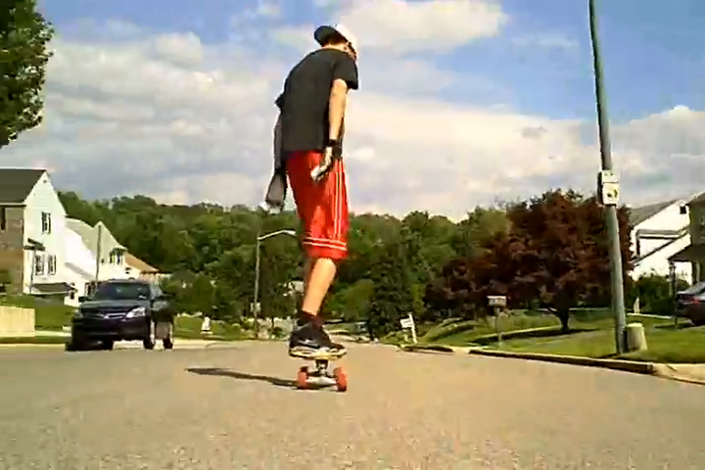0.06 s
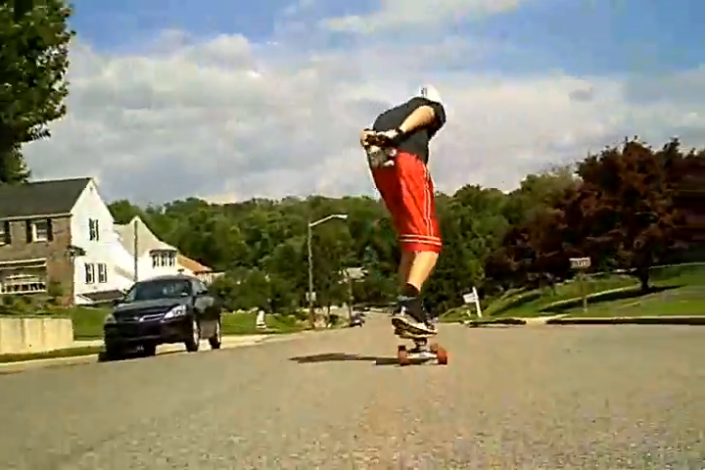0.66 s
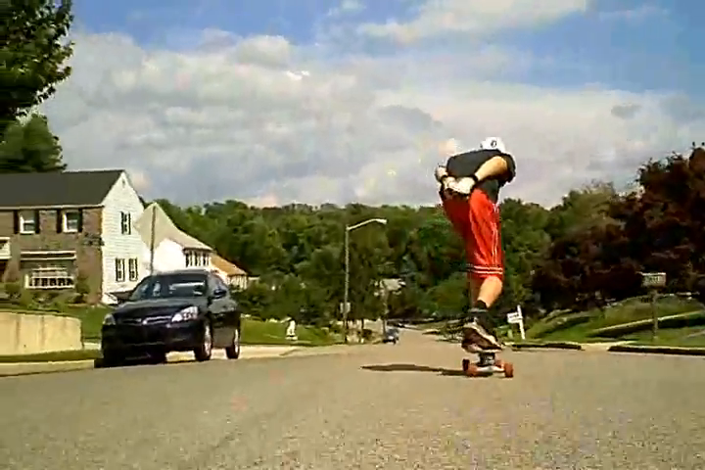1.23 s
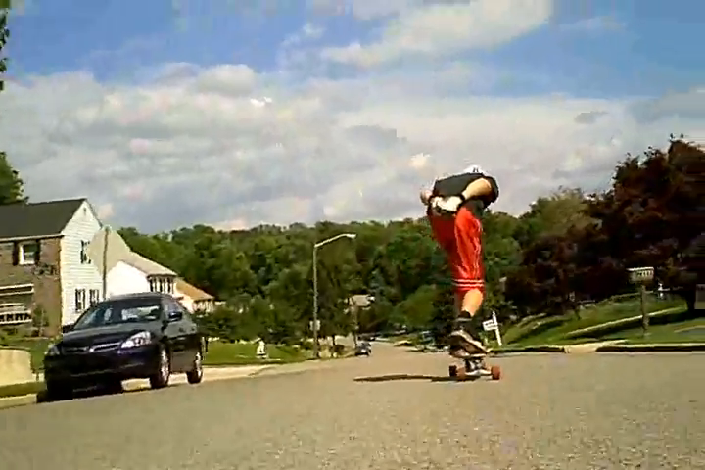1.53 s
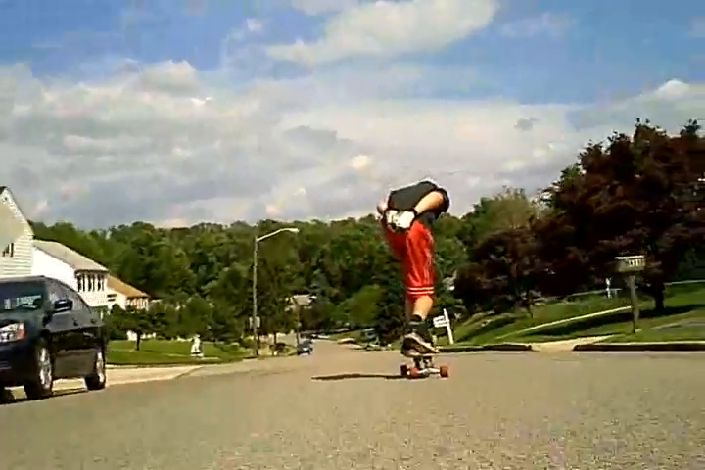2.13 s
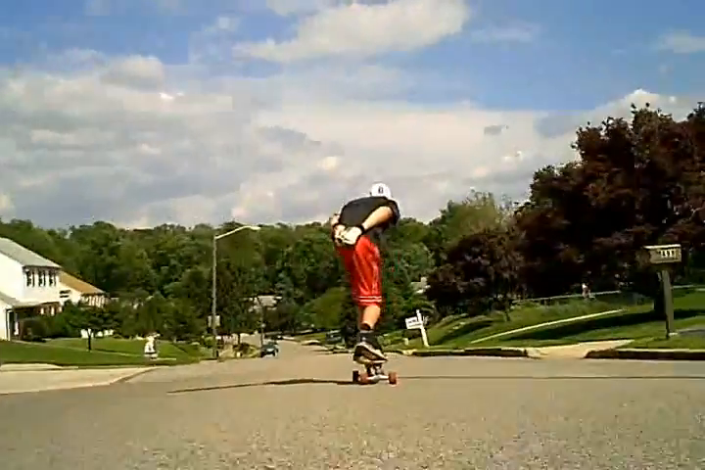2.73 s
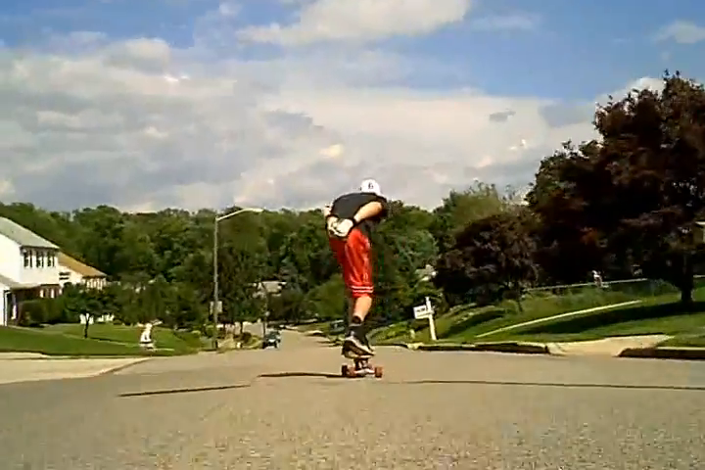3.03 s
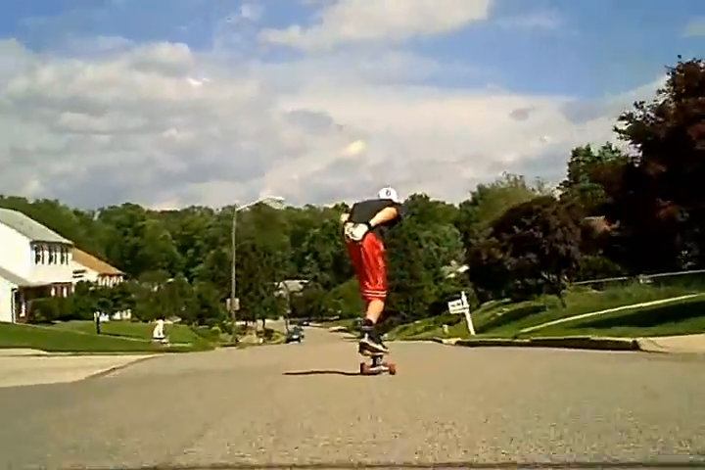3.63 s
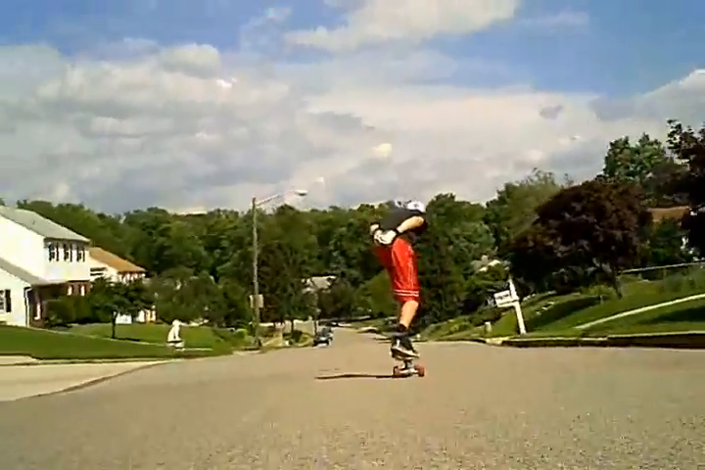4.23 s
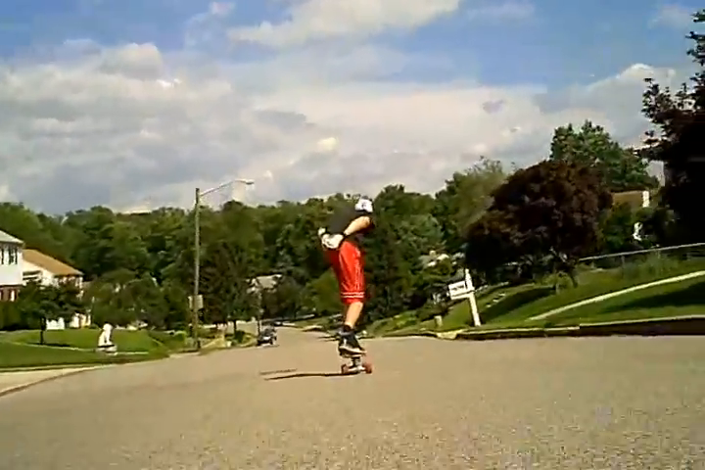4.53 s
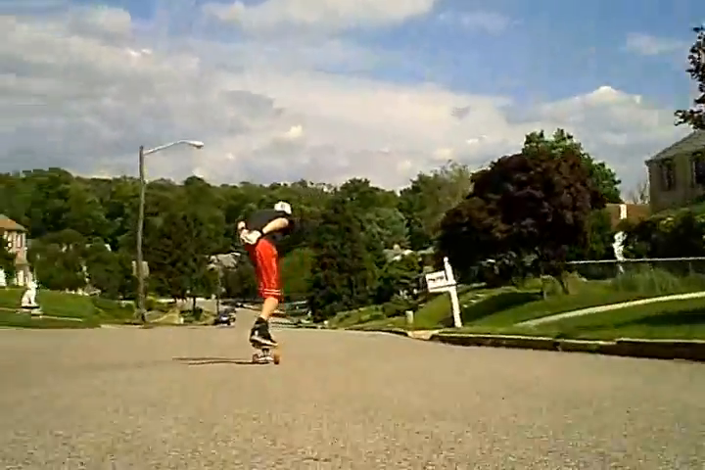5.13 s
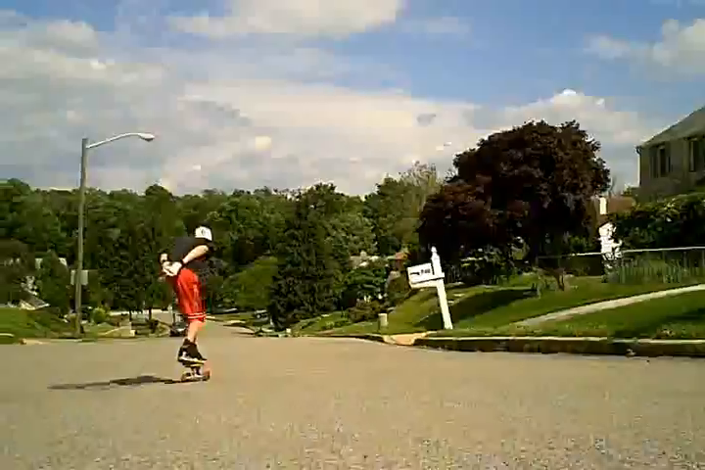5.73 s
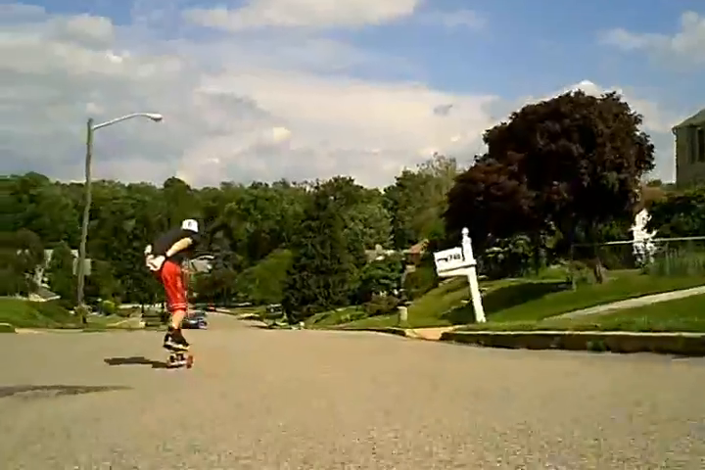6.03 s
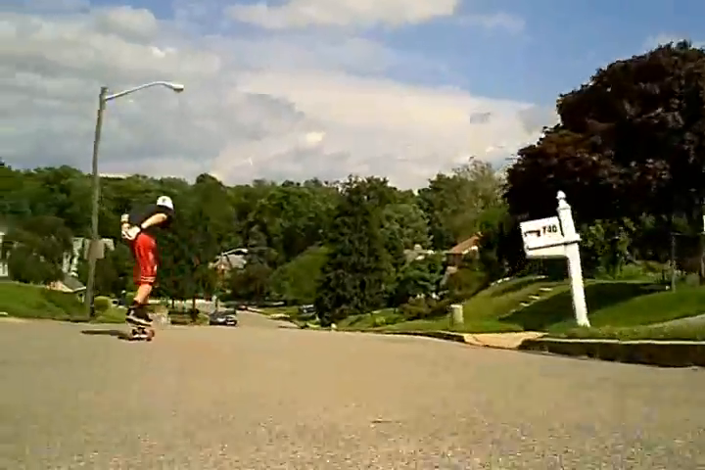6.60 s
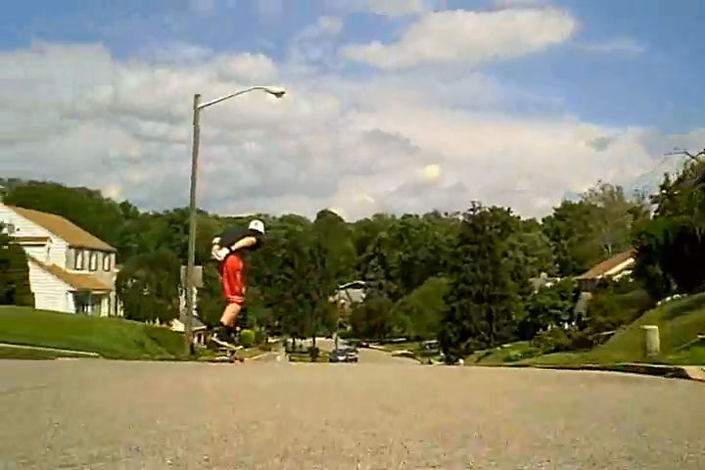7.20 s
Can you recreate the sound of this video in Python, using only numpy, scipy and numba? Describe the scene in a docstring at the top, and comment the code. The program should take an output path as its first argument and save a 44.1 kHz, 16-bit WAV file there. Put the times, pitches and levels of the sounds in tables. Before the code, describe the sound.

Skateboard wheels roll fast over coarse asphalt with a loud, steady, clattering rumble, gritty crunch and frequent knocks from stones.

```python
"""A loud, clattering rumble: a longboard rolls fast over coarse asphalt, heard by a camera on its deck. Stones
in the road hit the chattering wheels and ring the deck and the trucks (the metal axles). All the stones rumble,
the tall ones clatter, and sharp edges and loose chips add a gritty crunch. Larger stones knock, the flexing
deck hums, a faint fizz rises and falls with the loudness, and the camera mount ticks."""
import sys
import numpy as np
from scipy import signal
from scipy.fft import rfft, irfft
from scipy.io import wavfile
from scipy.ndimage import uniform_filter1d
from numba import njit

SR = 44100
rng = np.random.default_rng(int(sys.argv[2]) if len(sys.argv) > 2 else 0)


def digitize_waveform(pressure):
    """Quantize a signal to 16-bit integers and store it at the path in sys.argv[1].

    Rows of a 2-D input are taken as channels; values are limited to [-1, 1].
    """
    field = np.atleast_2d(pressure).T
    bounded = np.clip(field, -1, 1)
    quanta = np.round(bounded * 32767).astype(np.int16)
    wavfile.write(sys.argv[1], SR, quanta)


N = 320166

# The road, roughest around 3 s: time_s, rumble_db, clatter_vs_rumble_db
ROAD_LEVELS = [(0, -19.5, -11), (0.8, -20, -10), (1.55, -20, -8), (2.3, -18, -7.5), (3.05, -18, -5),
               (3.7, -19.5, -5.5), (4.45, -20, -7.5), (4.95, -20, -6.5), (5.2, -22, -7), (5.9, -21.5, -9.5),
               (6.2, -22, -9.5), (6.6, -20.5, -7.5), (7.26, -21, -8)]
# The ride starts gritty and boomy, then settles: time_s, grit_vs_clatter_db, boom_db, chips_vs_grit_db
ROAD_TEXTURE = [(1.2, -13, 6, -5.5), (2.5, -15, 0.5, -8.5), (6.1, -14, 1, -9)]
# Brief lulls in the roll: middle_s, length_s, rumble_change_db, clatter_and_grit_change_db
ROAD_LULLS = [(0.39, 0.09, -1.5, 0.5), (0.742, 0.02, -3.5, -6), (0.775, 0.13, -2, -3),
              (1.38, 0.076, -1, -4.5), (1.545, 0.034, -4, -9), (2.48, 0.067, -5, -2.5),
              (3.87, 0.055, -4, 0.5), (4.38, 0.11, -2, -1.5), (4.53, 0.14, -1.5, -3),
              (5.235, 0.028, -3, -6), (6.16, 0.067, -3, -5.5)]
# Coarse spots that crunch: middle_s, length_s, rumble_change_db, clatter_change_db, grit_change_db
ROUGH_SPOTS = [(0.05, 0.072, -1, 6, 6.5), (0.155, 0.026, 2, 9, 1.2), (0.228, 0.064, 3.5, 3, 3.9),
               (0.46, 0.053, -1, 5, 2.2), (1.237, 0.025, 1, 6.1, 2.5), (1.31, 0.027, -1, 2.8, 2.5),
               (1.445, 0.016, 0.5, 3, 4), (1.724, 0.034, 0.5, 4.2, 4.5), (1.895, 0.055, 1.5, 2.2, 3.5),
               (2.38, 0.065, 2.5, 2.3, 4.6), (2.622, 0.043, -0.5, 2.3, 1.2), (3.343, 0.012, -0.5, 6.1, 6.2),
               (4.028, 0.0086, -2, 4.6, 4), (4.852, 0.046, 0.5, 3.2, 2.1), (5.51, 0.037, 5, 1.2, 1.8),
               (6.935, 0.035, 3, 5.4, 4.6), (7.055, 0.044, 1, 3.8, 3.4)]


def rolling(force, give=10.5, soft_power=0.49, boom_hz=380, hiss_db=-9):
    """Soft wheels even out the blows into a rumble; tall stones clatter and sharp ones add grit."""
    road_db, clatter_vs_rumble_db = curve(ROAD_LEVELS)
    grit_db, boom_db, chips_db = curve(ROAD_TEXTURE)
    limit = give * np.sqrt(np.mean(force[force != 0] ** 2))
    force = limit * np.tanh(force / limit)  # the wheel gives way under the tallest stones
    push = np.sign(force) * np.abs(force) ** soft_power
    boom = signal.sosfiltfilt(signal.butter(3, boom_hz, fs=SR, output="sos"), push)
    push = push + (undb(boom_db) - 1) * boom
    grit = sharp_edges(force) + undb(chips_db) * loose_chips()
    grit = grit + undb(hiss_db) * rng.standard_normal(N)  # fine sand hisses evenly
    patches = wander(per_s=26)  # the asphalt changes from patch to patch
    lull_rumble_db, lull_clatter_db = stretches(ROAD_LULLS, length_share=0.41)
    rumble_db = road_db + 0.56 * patches + lull_rumble_db
    clatter_db = road_db + clatter_vs_rumble_db + 0.66 * patches + lull_clatter_db
    spots_db = stretches(ROUGH_SPOTS, length_share=0.6)
    levels_db = np.add([rumble_db, clatter_db, clatter_db + grit_db], spots_db)
    drives, spans_s, trims_db = (push, force, grit), (0.05, 0.032, 0.036), (-1.2, -0.6, -0.4)
    out = np.zeros(N)
    for drive, ring, span_s, db, trim_db in zip(drives, board_rings(), spans_s, levels_db, trims_db):
        shake = signal.fftconvolve(drive, ring)[:N]
        out += rider_weight(shake, span_s) * undb(db + trim_db)
    return out


def stone_tips(settle_s=0.0022, steady_load=0.34, sway_db=0.23):
    """Stone tips hit the chattering wheels, which land with a jolt and unload within milliseconds."""
    hops = fade(impacts(per_s=300, spread_db=10.5), settle_s)
    load = steady_load + np.sqrt(unit(np.abs(hops)))
    blows = impacts(per_s=2400, spread_db=3.5) * rng.choice([-1, 1], N)
    return blows * load * undb(sway_db * wander(per_s=91))


def sharp_edges(force, brightness=0.31, low_hz=2640, high_hz=5860, sharpness=9.3, ping_db=5, count=8):
    """The edge of each stone bites into the wheel and ticks at one of several pitches."""
    pick = rng.integers(count, size=N)
    pings = sum(signal.lfilter(*signal.iirpeak(hz, sharpness, fs=SR), force * (pick == k))
                for k, hz in enumerate(np.geomspace(low_hz, high_hz, count)))
    return unit(force + brightness * np.diff(force, prepend=0) + undb(ping_db) * pings)


def loose_chips(per_s=190, spread_db=3.0, ring_s=0.0061, pitch_hz=3980, pitch_spread=0.25):
    """Loose grit cracks under the wheels in short ticks, each with its own pitch."""
    out, t = np.zeros(N), np.arange(400) / SR
    starts_s = np.flatnonzero(rng.random(N) < per_s / SR) / SR
    for start_s, (pitch, strength) in zip(starts_s, rng.standard_normal((N // 50, 2))):
        hz = min(pitch_hz * np.exp(pitch_spread * pitch), SR / 4)
        add(out, start_s, ping(t, hz, ring_s), spread_db * strength)
    return unit(out)


def rider_weight(shake, span_s):
    """The rider's weight keeps the average shaking steady over a few wheel turns."""
    size = int(span_s * SR)
    power = uniform_filter1d(uniform_filter1d(shake ** 2, size), size)
    return shake / np.sqrt(power + 1e-18)


# The overall tone of wheels, trucks and deck when hit: pitch_hz, level_db
BOARD_TONE = [(30, -32), (64, -46), (107, -27.5), (180, -15), (250, -4), (480, 0), (660, -4.5), (950, -5),
              (1400, -12), (1850, -20), (2400, -28), (3700, -36), (6500, -45), (15000, -57.5)]
# Pitches that ring out above that tone: pitch_hz, width_hz, boost_db
BOARD_PEAKS = [(138, 22, 4.5), (247, 140, 3), (834, 370, 1), (1256, 44, 4), (1740, 650, 7.5),
               (3770, 600, 3), (5340, 250, 3)]
# Borders of the low (rumble), middle (clatter) and high (grit) ranges: border_hz
BORDERS_HZ = [10, 900, 2300, 20000]


def board_rings(size=4096):
    """The board rings after one blow: one short sound each for the low, middle and high range."""
    hz = np.maximum(np.arange(size // 2 + 1) * SR / size, 1)
    tone_hz, tone_db = np.transpose(BOARD_TONE)
    db = np.interp(np.log(hz), np.log(tone_hz), tone_db)
    db = db + sum(boost / (1 + (2 * (hz - pitch) / width) ** 2) for pitch, width, boost in BOARD_PEAKS)
    gains = [undb(db) / np.sqrt((1 + (low / hz) ** 8) * (1 + (hz / high) ** 8))
             for low, high in zip(BORDERS_HZ, BORDERS_HZ[1:])]
    # Shape each ring so that it follows the blow and never comes before it (minimum phase).
    cepstrum = irfft(np.log(gains))
    cepstrum[:, 1:size // 2] *= 2
    cepstrum[:, size // 2 + 1:] = 0
    return irfft(np.exp(rfft(cepstrum)))


# Larger stones in the wheels' path: start_s, thud_db, clack_db, snap_db, bounce_vs_first_blow_db
BIG_STONES = [(0.173, -1, -17, -37, -19), (0.26, -10, -22, -35, -16), (0.292, -0.5, -12, -28, -1),
              (0.438, -26, -17, -23, -9), (0.454, -21, -5, -32, -7), (0.674, -4, -10.5, -22, -10),
              (0.6965, -9, -9, -24.5, -11), (0.724, -5, -5, -21.5, -3), (0.817, -8.5, -18, -27, 4),
              (0.855, -2.5, -26, -25, -6.5), (0.907, -23, -10.5, -31, 4), (0.996, -17, -9, -40, 1),
              (1.2206, -3.5, -7, -23.5, -8), (1.2991, -8, -12, -24, -11), (1.3187, -2, -14, -23, -7),
              (1.329, -3, -16, -31, -10), (1.4848, -6, -14, -25, -11), (1.654, -9, -12, -33, -12),
              (1.711, -19, -9, -21, -10), (1.7343, -5, -9, -22, -6), (1.8861, -10, -5.5, -24, -1),
              (2.089, -4, -12, -26, 1), (2.209, -6.5, -9, -18.5, 2.5), (2.2797, -3.5, -8, -25, -11),
              (2.3556, -7, -5, -22, -19), (2.493, -3, -16, -26, -23), (2.575, -5, -9, -26, -10),
              (2.5987, 1.5, -9, -23, -10), (2.6392, -2.5, -2.5, -22, -0.5), (2.8363, -4, -1.5, -15.5, 0),
              (2.86, 4, -15, -26, -24), (2.978, 0.5, -12, -30, -4), (3.2529, -1, -7, -21, -16),
              (3.3613, 0, -2, -16, -4.5), (3.4872, -5.5, -7, -20, -9), (3.5268, -2, -20, -30, -7),
              (3.593, -16, -4, -22.5, -26), (3.6996, -8, -14, -29, -15), (3.78, 1.5, -10, -30, -12),
              (3.816, -2, -13, -27, -14), (3.923, -2.5, -18, -30, -8), (3.9952, -10, -14, -21, -14),
              (4.0045, 1.5, -7, -22.5, -5.5), (4.0868, -2.5, -9, -23, -17), (4.1058, -6, -7.5, -25, -7),
              (4.27, -13, -8, -23, -6), (4.466, -2.5, -15, -30, -17), (4.574, -6, -10, -32, -4),
              (4.8101, -6, -7.5, -24, -19), (4.8698, -7, -1.5, -20, -14), (5.0356, -3.5, -3, -15.5, -26),
              (5.046, -7, -8, -28, -22), (5.0567, -21, -6, -21, -18), (5.2589, -16, -3.5, -16.5, -18),
              (5.482, -5, -14, -30, -18), (5.6995, -5.5, -24, -33, -13), (5.892, -22, -15, -30, -25),
              (5.934, -19, -12.5, -27.5, -2.5), (6.1021, 0, -22, -28.5, -8), (6.319, -8, -8.5, -27, -5),
              (6.553, -20, -12, -28, -6), (6.5837, -14, -6, -25.5, -6), (6.5947, -7, -9, -25, -16),
              (6.931, -19, -5, -24, -6), (6.973, -4.5, -6, -22, -13), (7.046, 1, -10, -30, -10)]


def stone_knocks(bite_s=0.002, scrape_s=0.0016, bounce_s=0.0048, band_hz=(147, 6500), truck_db=3.0):
    """A large stone wedges under the wheel, strikes and scrapes free, and the wheel lands once more."""
    out, t, rings = np.zeros(N), np.arange(1700) / SR, board_rings()
    cushion = signal.butter(2, band_hz, "band", fs=SR, output="sos")
    scrape = 0.088 * np.minimum((t / bite_s) ** 2, np.exp((bite_s - t) / scrape_s))
    blow = signal.unit_impulse(len(t), int(bite_s * SR))
    blow_shares, trims_db = (1, 0.8, 0.25), (-5.0, -4.5, -0.5)  # the snap is more crunch than blow
    for start_s, thud_db, clack_db, snap_db, bounce_db in BIG_STONES:
        levels_db = np.add((thud_db, clack_db, snap_db), trims_db)
        landing_s = start_s + bounce_s * np.exp(0.12 * rng.standard_normal())
        for hit_s, hit_db in (start_s, 0), (landing_s, bounce_db):
            crunch = scrape * rng.standard_normal(len(t))
            for ring, blow_share, db in zip(rings, blow_shares, levels_db):
                force = signal.sosfilt(cushion, crunch + blow_share * blow)
                add(out, hit_s - bite_s, signal.fftconvolve(force, ring), db + hit_db)
            add(out, hit_s, signal.sosfilt(cushion, truck_ring(t)), snap_db + truck_db + hit_db)
    return out


# The notes of a metal truck: pitch_hz, ring_s, level_db
TRUCK_NOTES = [(1260, 0.038, -4), (1876, 0.033, 2.5), (2370, 0.014, 0), (2840, 0.02, -4),
               (3220, 0.025, -14.5), (4220, 0.025, -17)]


def truck_ring(t, detune=0.018):
    """A hard blow sets the metal truck ringing, at slightly different pitches each time."""
    return sum(undb(db) * ping(t, hz * (1 + detune * rng.standard_normal()), ring_s)
               for hz, ring_s, db in TRUCK_NOTES)


# The deck's hum changes as the rider shifts weight: pitch_hz, width_hz, start_boost_db, end_boost_db
DECK_NOTES = [(395, 14.7, 5, 4.5), (435, 11, -0.5, 4.5), (485.6, 29, 3, 3), (543, 49, 5, 4)]
# Moments when the hum swells: middle_s, length_s, boost_db
DECK_SWELLS = [(1.08, .2, 3), (3.25, .25, 0), (3.8, 0.073, 1), (4.05, .15, 0.5), (4.81, .08, 2.5),
               (5.88, 0.36, 1.5), (6.85, 0.28, 1.5)]


def with_deck_hum(shake, flex_per_s=4.0, pitch_drift=0.013, drift_db=1.5):
    """The deck flexes under the rider, so each note of its hollow hum drifts, swells and fades."""
    out = shake
    swell_db, = stretches(DECK_SWELLS, length_share=0.41)
    for hz, width_hz, start_db, end_db in DECK_NOTES:
        boost_db = np.linspace(start_db, end_db, N) + swell_db + drift_db * wander(flex_per_s)
        pitch_hz = hz * (1 + pitch_drift * wander(flex_per_s))
        out = out + (undb(boost_db) - 1) * resonate(shake, pitch_hz, float(width_hz))
    return out


# Ticks of the camera mount: start_s, level_db
MOUNT_TICKS = [(0.1451, -38), (0.561, -46), (1.484, -39), (1.71, -38), (2.605, -38), (2.639, -30),
               (2.838, -34), (4.8714, -42), (5.258, -47), (6.4238, -41), (6.932, -36), (7.0469, -45)]


def fizz_and_ticks(shake, fizz_db=-63.0, crackle_db=-62.5, tick_s=0.00059, tick_db=8.5, low_cut_hz=2500):
    """A faint fizz and crackle above 2.5 kHz rise and fall with the loudness, and now and then the camera mount
    ticks."""
    jolts = fade(np.abs(np.diff(shake, prepend=0)), decay_s=0.0023)
    crackle = fade(impacts(per_s=46, spread_db=3.0), tick_s)
    out = undb(fizz_db) * unit(jolts * rng.standard_normal(N))
    out += undb(crackle_db) * unit(jolts * crackle * rng.standard_normal(N))
    tick_shape = np.exp(-np.arange(300) / SR / tick_s)
    for start_s, level_db in MOUNT_TICKS:
        add(out, start_s, tick_shape * rng.standard_normal(len(tick_shape)), level_db + tick_db)
    return signal.sosfilt(signal.butter(1, low_cut_hz, "high", fs=SR, output="sos"), out)


def undb(db):
    """Turn decibels into a volume factor."""
    return 10 ** (np.asarray(db) / 20)


def unit(x):
    """Scale a sound to an average strength (rms) of 1."""
    return x / np.sqrt(np.mean(x ** 2))


def add(out, start_s, sound, db):
    """Mix a sound in at start_s with its peak at db."""
    i = max(int(start_s * SR), 0)
    out[i:i + len(sound)] += (undb(db) * sound / np.abs(sound).max())[:N - i]


def ping(t, hz, ring_s):
    """A pure tone that fades by 60 dB in ring_s."""
    return np.sin(2 * np.pi * hz * t) * np.exp(-np.log(1000) * t / ring_s)


def impacts(per_s, spread_db):
    """Blows of random size at random moments."""
    return (rng.random(N) < per_s / SR) * undb(spread_db * rng.standard_normal(N))


def fade(x, decay_s):
    """Let every value of x die away smoothly."""
    pole = np.exp(-1 / (decay_s * SR))
    return signal.lfilter([1 - pole], [1, -pole], x)


def wander(per_s):
    """A smooth random drift, typically about 1 away from zero."""
    hold = max(int(SR / per_s), 2)
    steps = np.repeat(rng.standard_normal(N)[:N // hold + 1], hold)
    return 1.3 * uniform_filter1d(uniform_filter1d(steps, hold), hold)[:N]


def curve(rows):
    """Join a table's timed rows with straight lines, one curve for each level column."""
    times_s, *columns = np.transpose(rows)
    return [np.interp(np.arange(N) / SR, times_s, column) for column in columns]


def stretches(rows, length_share, step=20):
    """Brief flat-topped rises or dips in level, one curve for each dB column."""
    middle_s, length_s, *changes_db = np.transpose(rows)[:, :, None]
    distance = (np.arange(0, N, step) / SR - middle_s) / (length_share * length_s)
    inside = np.exp(-distance ** 4)
    return [np.repeat((db * inside).sum(axis=0), step)[:N] for db in changes_db]


@njit
def resonate(x, hz, width_hz):
    """Keep only the sound near a moving pitch (a state-variable band-pass filter)."""
    out, band_state, low_state = np.empty(len(x)), 0., 0.
    for i in range(len(x)):
        tuning, damping = np.tan(np.pi * hz[i] / SR), width_hz / hz[i]
        band = (band_state + tuning * (x[i] - low_state)) / (1 + tuning * (tuning + damping))
        band_state = 2 * band - band_state
        low_state += 2 * tuning * band
        out[i] = damping * band
    return out


def scene():
    """Road texture and larger stones shake the board, and the board shakes the camera."""
    board = with_deck_hum(rolling(stone_tips()) + stone_knocks())
    return (board + fizz_and_ticks(board))[None]


def record(dry):
    """The camera rounds only the very highest peaks and cuts the deep bass and the top treble."""
    ceiling, low_hz, top_hz = 0.98, 65, 15900
    rounded = dry / (1 + (dry / ceiling) ** 16) ** (1 / 16)
    thinned = signal.sosfilt(signal.butter(2, low_hz, "high", fs=SR, output="sos"), rounded)
    return signal.sosfilt(signal.ellip(10, 0.2, 80, top_hz, fs=SR, output="sos"), thinned)


dry = scene()
out = record(dry)
digitize_waveform(out)
```